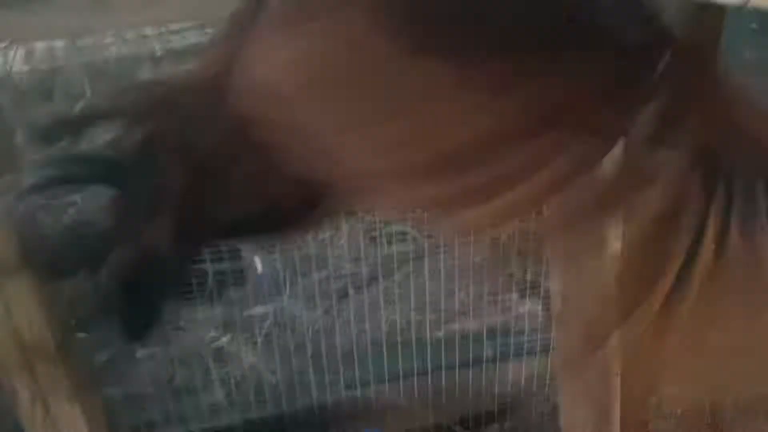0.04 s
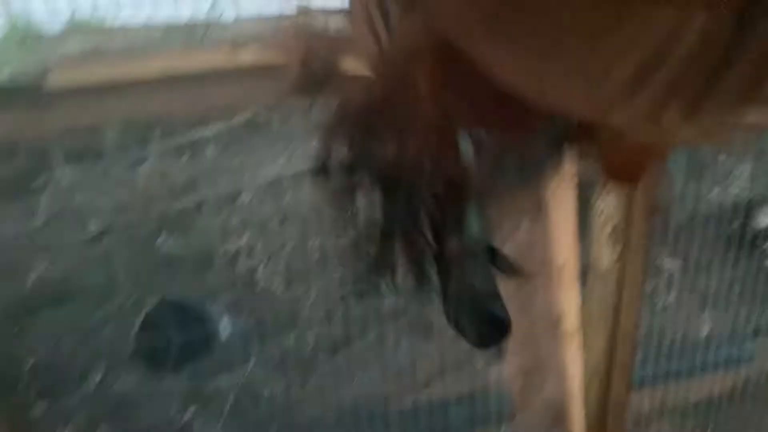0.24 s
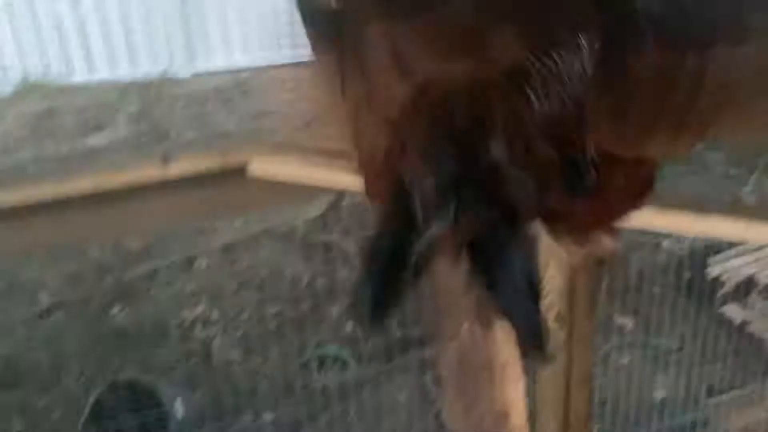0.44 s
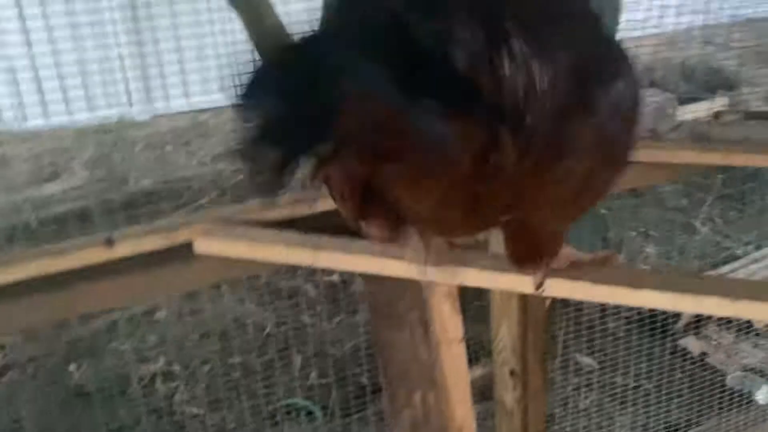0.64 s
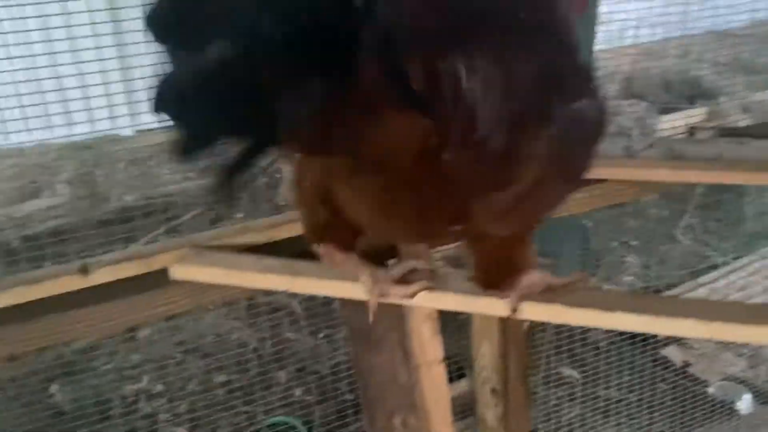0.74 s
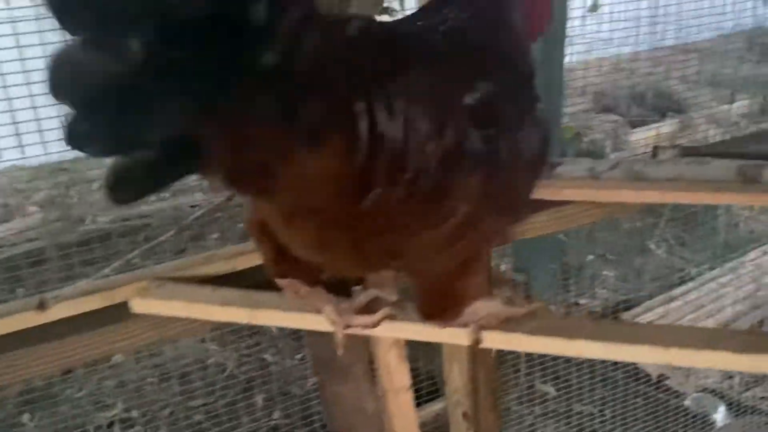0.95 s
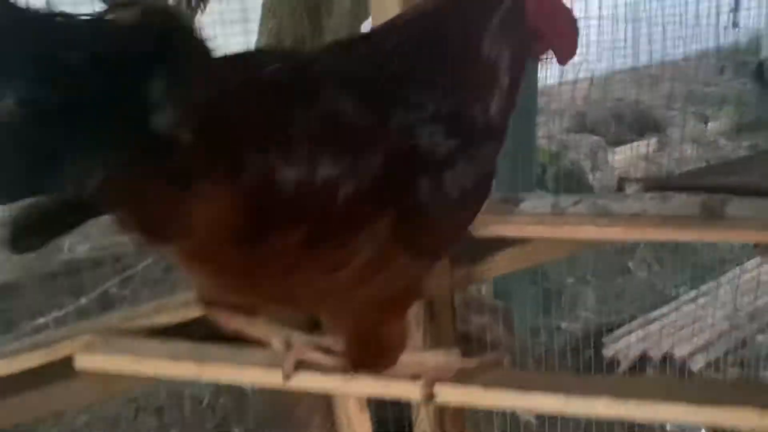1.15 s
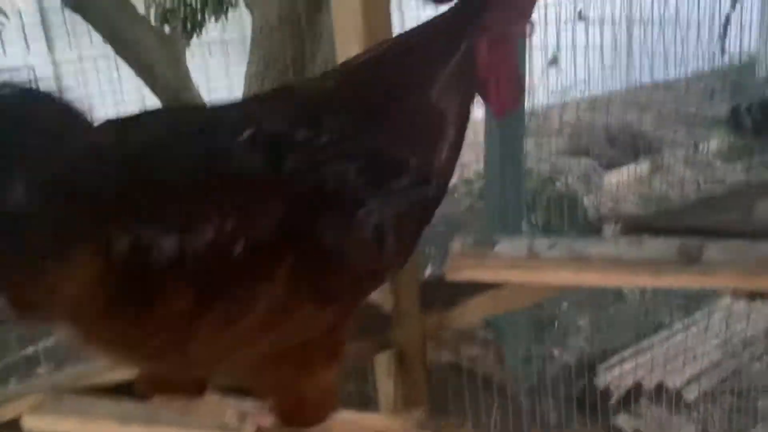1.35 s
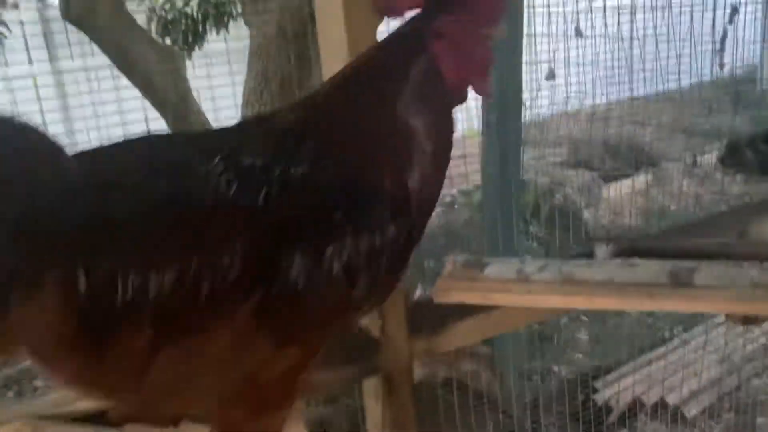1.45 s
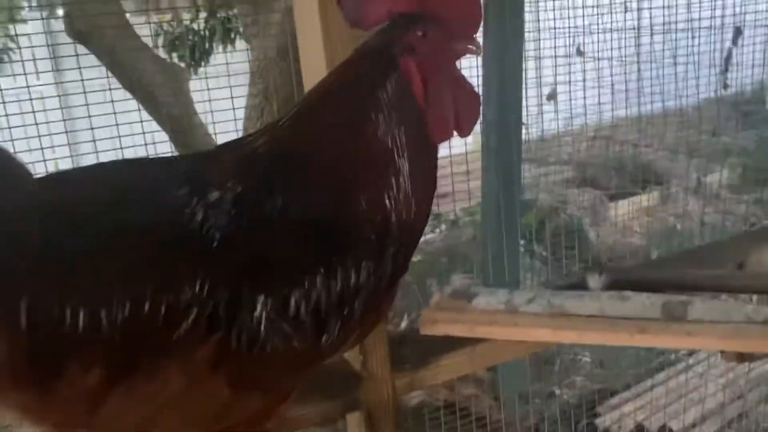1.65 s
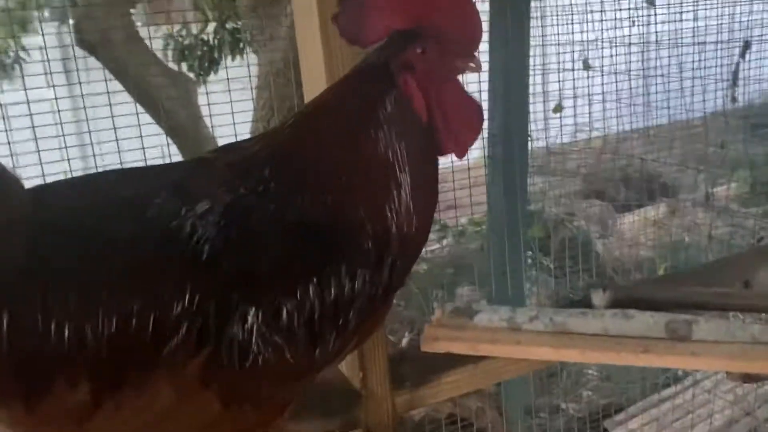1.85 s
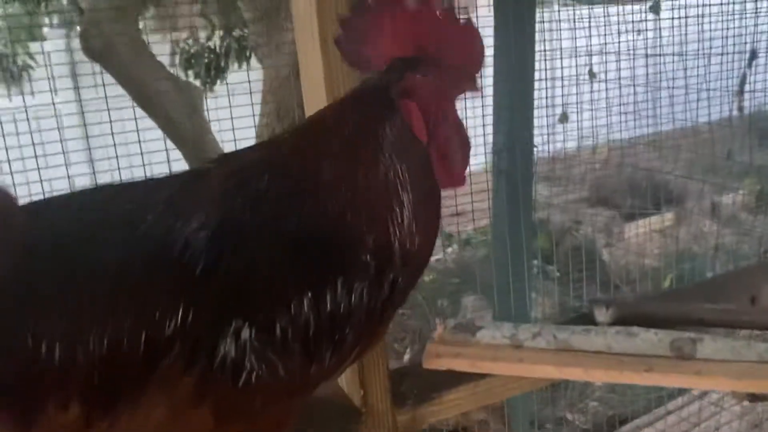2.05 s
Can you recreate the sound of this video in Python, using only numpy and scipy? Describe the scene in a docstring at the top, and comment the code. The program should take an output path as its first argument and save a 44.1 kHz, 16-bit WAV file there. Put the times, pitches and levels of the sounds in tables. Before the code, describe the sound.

Very close, booming wing gusts burst out almost at once and die within half a second, followed by claw clicks, dull scuffs, feather brushing, a faint low croon and small throaty clucks in a quiet wire coop.

```python
"""Rooster flapping onto a perch

A rooster flaps up onto a wooden perch in a wire coop, right beside the microphone.
Bursts of low, eddying noise make the wing gusts; grainy hiss makes the feathers rustle and brush.
Short noise bursts and decaying tones tick, knock and ring as claws meet the rail, and feet scuff it.
Rough pulse trains through throat filters cluck and croon over the filtered noise of a quiet yard."""
import sys
import numpy as np
from scipy import signal
from scipy.fft import rfft, irfft
from scipy.io import wavfile
from scipy.ndimage import uniform_filter1d

SR = 44100
rng = np.random.default_rng(int(sys.argv[2]) if len(sys.argv) > 2 else 0)


def waveform_to_disk(signal):
    """Save audio, clipped to [-1, 1], as 16-bit WAV at the path in sys.argv[1]."""
    frames = np.transpose(np.atleast_2d(signal))
    scaled = np.clip(frames, -1, 1) * 32767
    samples = np.round(scaled).astype(np.int16)
    wavfile.write(sys.argv[1], SR, samples)


N = 92610  # samples, 2.1 s
TIME = np.arange(N) / SR

# Colour tables give only the balance between frequencies: the coloured sound is then set to its level.
# Rise, fall and width times run from the peak to 1/e of it.

# Steady hush of the yard: freq_hz, relative_db
YARD_COLOUR = [(25, -58), (55, -6), (110, 3), (250, -8.5), (600, -6), (1200, -11.5), (3000, -24.5),
               (8000, -39.5), (15600, -39)]
YARD_DB, YARD_LIKENESS, YARD_LAG_S = -54.5, 0.63, 0.000326
# Low rumble of moving air: time_s, level_db
RUMBLE = [(0, -39.5), (.62, -39.5), (.82, -48), (1.0, -62), (1.2, -51), (1.57, -76), (1.7, -50), (1.9, -46),
          (2.1, -45.5)]
# Colour of the rumble: freq_hz, relative_db
RUMBLE_COLOUR = [(20, -47), (40, -13.5), (60, -2), (100, -7.5), (160, -18), (240, -13), (450, -30.5),
                 (1200, -82)]

# Feather rustle over time: time_s, treble_level_db, midrange_level_db
RUSTLE = [(0, -49, -54.5), (.14, -45, -43), (.3, -49, -57), (.42, -52, -53), (.53, -62.5, -58.5),
          (.8, -68.5, -55.5), (.95, -68, -57), (1.08, -56, -55), (1.23, -57, -61.5), (1.5, -61, -56),
          (1.8, -66, -69), (2.1, -82, -73)]
# Colour of the treble fizz: freq_hz, relative_db
FIZZ_COLOUR = [(800, 4), (2000, 0), (3300, 0), (5500, -2), (7400, -1), (10000, -3.5), (13000, -5),
               (15600, -4)]
# Colour of the midrange swish: freq_hz, relative_db
SWISH_COLOUR = [(100, -1), (250, 6), (500, -8), (1000, -0.5), (1500, -6.5), (2500, -16.5), (6000, -91)]
# GRAIN_DB spreads the grain sizes; GRAIN_SHARE is the grains' part of the mix with hiss
GRAIN_DB, GRAINS_PER_S, GRAIN_SHARE = 3, 700, 0.38

# Scuffs and dull knocks of feet and body on the perch: peak_s, rise_s, fall_s, level_db, centre_hz
SHUFFLES = [(0.094, 0.039, 0.012, -40.5, 616), (.52, 0.0084, 0.012, -41.5, 1120),
            (0.584, 0.018, 0.0074, -39.5, 715), (0.901, 0.0053, 0.0097, -50.5, 2000),
            (1.021, 0.039, 0.03, -46.5, 615), (1.057, 0.015, 0.0045, -40, 930),
            (1.074, 0.02, 0.016, -38, 177), (1.134, 0.005, 0.021, -48.5, 580)]
SHUFFLE_SKIRT = 2.58  # exponent of the slopes either side of the centre

# Wing gusts: peak_s, rise_s, fall_s, level_db, corner_hz
GUSTS = [(0.104, 0.028, 0.023, -31.5, 80.5), (0.189, 0.042, 0.042, -24, 62),
         (.231, 0.0057, 0.0057, -12.5, 318), (.242, 0.0052, 0.018, -8, 197),
         (0.272, 0.015, 0.013, -10.5, 443), (0.288, 0.0034, 0.007, -4.5, 605),
         (0.302, 0.0033, 0.014, -8.5, 422), (0.306, 0.043, 0.053, -10.5, 87),
         (.378, 0.02, 0.013, -17.5, 330), (0.408, 0.055, 0.048, -20, 164), (0.488, 0.013, 0.01, -19, 131),
         (0.538, 0.039, 0.052, -26.5, 78.6), (0.708, 0.0071, 0.017, -35.5, 77)]
GUST_ORDER, GUST_LOW_HZ, GUST_APART_HZ = 3.46, 38.5, 565  # left and right differ above GUST_APART_HZ
GUST_BOOM_HZ, GUST_BOOM_WIDTH_HZ, GUST_BOOM_DB = 59.6, 5.1, 6
GUST_LIKENESS, GUST_LEFT_DB = 0.92, 9
EDDIES_PER_S, EDDY_BLUR = 600, 0.38  # EDDY_BLUR is the noise added to eddies of rms 1

# Claw and quill clicks: time_s, level_db (before CLICK_DB), knock_against_tick_db (before KNOCK_DB)
CLICKS = [(0.0921, -29, 9.5), (0.112, -29.5, 1), (0.197, -28, -12), (0.2642, -22, 6.5), (0.2833, -25.5, 10),
          (0.5072, -28.5, -3), (0.5142, -34.5, 5.5), (0.561, -38.5, 3), (0.582, -34.5, -24),
          (0.595, -33.5, -5), (0.623, -52.5, 14.5), (0.6499, -35.5, -7.5), (0.6601, -32, -3),
          (0.982, -35.5, -5), (0.987, -32.5, -13), (1.05, -30.5, -23), (1.2874, -22, -39),
          (1.41, -33.5, -5.5), (1.5312, -46.5, 6.5), (1.6227, -32.5, -17), (1.666, -39, -24),
          (1.7632, -41.5, 8), (2.0518, -39.5, -30)]
# Colour of the tick: freq_hz, relative_db
TICK_COLOUR = [(900, -11.5), (2000, -2.5), (2700, 0), (4000, -1), (6000, -3.5), (7400, 4.5), (10000, -0.5),
               (15600, -7.5)]
# Colour of the wooden knock: freq_hz, relative_db
KNOCK_COLOUR = [(150, 5), (400, 12), (750, -1), (1500, 5), (2300, -22.5), (4000, -17.5)]
# What the claws set ringing: pitch_hz (before detuning), level_against_tick_db, t60_s
RING = [(2510, -18, 0.084), (3460, -15.5, 0.026), (5260, -16, 0.029), (7560, -20.5, 0.02)]
CLICK_ATTACK_S, TICK_S, KNOCK_S, RATTLE_S = 0.00043, 0.0006, 0.0033, 0.0044
CLICK_DB, KNOCK_DB, RATTLE_DB, CLICK_LEFT_DB = -3, 1.5, -11, 2.5
ECHO_S, ECHO_DB, CATCHES_PER_S = 0.003, -11.5, 350
# Softer clicks lose treble: DULLING is dB per octave above BRIGHT_HZ for each dB below FULL_CLICK_DB
BRIGHT_HZ, FULL_CLICK_DB, DULLING = 6020, -13.5, 0.61

# Wing feathers brushing along the body: peak_s, width_s, level_db
BRUSHES = [(0.21, 0.035, -47), (0.458, 0.018, -45), (0.866, 0.012, -55.5), (1.139, 0.021, -48),
           (1.955, 0.017, -57)]
# Colour of a brush stroke: freq_hz, relative_db
BRUSH_COLOUR = [(700, -8), (1500, 6.5), (3000, 0), (4600, 5.5), (5800, -3.5), (7400, -1), (10000, -7.5),
                (15600, 0)]

# Thin high ringing: peak_s, fall_s, level_db
ZINGS = [(.718, 0.023, -57.5), (.856, 0.023, -64.5)]
# Resonances of the ringing: freq_hz, relative_db
ZING_PEAKS = [(4480, -5.5), (5265, -10)]
ZING_WIDTH_HZ, ZING_RISE_S = 120, 0.006

# Clucks: peak_s, rise_s, fall_s, level_db, pitch_hz, glide_octaves_per_s, roughness_0_to_1, tilt_db_per_octave
CLUCKS = [(0.727, 0.015, 0.01, -44.5, 500, -8, 0.37, -17), (.753, 0.0077, 0.0056, -35.5, 370, 0, 0.3, -3),
          (1.554, 0.022, 0.023, -45.5, 274.8, -2.5, 0.38, -5.5),
          (1.5913, 0.0067, 0.0038, -28, 352.3, -3, 0.49, 1.5),
          (1.768, 0.0099, 0.0064, -42, 350, -5.5, 0.54, -1.5),
          (1.802, 0.004, 0.0064, -35.5, 445, -4.5, 0.48, 9.5),
          (1.944, 0.0078, 0.007, -45.5, 330, -1, 0.8, -2), (1.989, 0.011, 0.013, -42.5, 410, 5.5, 0, -1),
          (2.012, 0.011, 0.0071, -38.5, 460, -2.5, 0.3, -5.5)]
# Throat resonances of the clucks: freq_hz, relative_db
CLUCK_THROAT = [(100, -32), (260, 1.5), (340, 4.5), (470, -1.5), (720, 7), (1000, 1), (1300, -1),
                (1750, -8.5), (2050, -14.5), (2400, -25.5), (4500, -43)]
CLUCK_JITTER = 0.027  # pitch waver as a fraction, rms
BIRD_RIGHT_DB, BIRD_LAG_S = 5, 0.00041
FRAME_ECHO_S, FRAME_ECHO_DB = 0.013, -14

# Low croon: time_s, pitch_hz, level_db
CROON = [(.76, 244, -68), (.80, 253.4, -48), (.87, 266.3, -46), (.93, 269.2, -49), (.98, 279.4, -51.5),
         (1.04, 279, -49), (1.09, 277, -76)]
# Throat resonances of the croon: freq_hz, relative_db
CROON_THROAT = [(260, 5), (530, 2), (770, -7), (1050, -6), (1350, -21), (3500, -50)]
CROON_LAG_S = -0.00062  # negative: the left channel hears it first

# Coop reverberation by band: low_hz, high_hz, t60_s
COOP = [(95, 700, 0.14), (644, 2500, 0.13), (2650, 6000, 0.13), (6260, 11400, 0.077)]
CLICK_WET_DB, BIRD_WET_DB = -7.5, -15.5

# Phase between left and right channels: freq_hz, left_lead_radians
STEREO_PHASE = [(0, 0), (7500, 0), (8450, -2.6), (9500, -3.6), (10300, -6), (11900, -6.5), (12900, -9.2),
                (13700, -9.6), (14500, -12.3), (16300, -13)]
# Left-right likeness of sound from all around: freq_hz, likeness_-1_to_1
LIKENESS = [(50, 1), (300, 0.77), (700, -0.012), (1300, -0.29), (2500, 0.6), (5000, 0.18), (7400, 0.84),
            (9000, 0.98)]
EDGE_HZ = 15850  # corner of the final lowpass


def amp(db):
    """Decibels to gain."""
    return 10 ** (np.asarray(db) / 20)


def unit(x):
    """Scales to rms 1."""
    return x / np.sqrt(np.mean(x ** 2) + 1e-20)


def freqs(x):
    """Frequencies of the spectrum of x in Hz, kept above zero."""
    return np.maximum(np.fft.rfftfreq(x.shape[-1], 1 / SR), 1)


def read(points, x):
    """A spectrum table at the frequencies of x, joined along log frequency."""
    f, value = np.transpose(points)
    return np.interp(np.log(freqs(x)), np.log(f), value)


def curve(rows, axis=1):
    """One column of a time table at every sample."""
    rows = np.array(rows)
    return np.interp(TIME, rows[:, 0], rows[:, axis])


def shaped(x, gain):
    """Filters x and scales it to rms 1."""
    return unit(irfft(rfft(x) * gain, x.shape[-1]))


def sides(left_db):
    """Gains of the two channels for a given left-right difference."""
    return amp(np.array([[.5], [-.5]]) * left_db)


def pair(x, same):
    """Makes two unrelated signals as alike as `same` at each frequency."""
    a, b = rfft(x)
    same = np.clip(same, -1, 1)
    mid = a * np.sqrt(1 + same)
    side = b * np.sqrt(1 - same)
    return irfft(np.array([mid + side, mid - side]), x.shape[-1])


def diffuse(x, colour):
    """Colours two unrelated signals as a sound from all around."""
    return shaped(pair(x, read(LIKENESS, x)), amp(read(colour, x)))


def arrive(x, lag):
    """A sound from one side: the left channel hears it lag seconds after the right."""
    late = np.exp(-2j * np.pi * freqs(x) * lag)
    return irfft(rfft(x) * np.array([late, np.ones_like(late)]), x.shape[-1])


def swell(x, t, rise, fall, db):
    """Lets x rise to its level at t = 0 and fall away."""
    env = np.exp(-(t / np.where(t < 0, rise, fall)) ** 2)
    loudness = np.sqrt(np.mean((env * x) ** 2) / np.mean(env ** 2))
    return amp(db) * env * x / loudness


def add(mix, s, sound):
    """Mixes a sound in at time s, trimmed to fit."""
    at = round(s * SR)
    sound = sound[:, max(-at, 0):]
    part = mix[:, max(at, 0):][:, :sound.shape[1]]
    part += sound[:, :part.shape[1]]


def play(source, rows, size=11025):
    """Plays each row of a table, centred on its time."""
    out = np.zeros((2, N))
    t = (np.arange(size) - size // 2) / SR
    for s, *row in rows:
        add(out, s + t[0], source(t, *row))
    return out


def specks(size, per_s):
    """Sparse impulses of random sign."""
    signs = np.sign(rng.standard_normal((2, size)))
    return unit(signs * (rng.random((2, size)) < per_s / SR))


def barbs(size):
    """Many tiny catches of feather barbs in a smooth hiss."""
    sizes = amp(GRAIN_DB * np.minimum(rng.exponential(1, (2, size)), 4))
    caught = rng.random((2, size)) < GRAINS_PER_S / SR
    grains = sizes * rng.standard_normal((2, size)) * caught
    return GRAIN_SHARE * unit(grains) + (1 - GRAIN_SHARE) * rng.standard_normal((2, size))


def yard():
    """Steady outdoor hush from the right and a slow rumble of air."""
    hush_noise, rumble_noise = rng.standard_normal((2, 2, N))
    hush = arrive(pair(hush_noise, YARD_LIKENESS), YARD_LAG_S)
    hush = shaped(hush, amp(read(YARD_COLOUR, hush_noise)))
    rumble = diffuse(rumble_noise, RUMBLE_COLOUR)
    return amp(YARD_DB) * hush + amp(curve(RUMBLE)) * rumble


def feathers():
    """Barbs slide over each other: a crackling fizz above a soft swish."""
    fizz = diffuse(barbs(N), FIZZ_COLOUR) * amp(curve(RUSTLE))
    swish = diffuse(barbs(N), SWISH_COLOUR) * amp(curve(RUSTLE, axis=2))
    return fizz + swish


def shuffle(t, rise, fall, db, centre_hz):
    """A scuff or dull knock against the rail: noise gathered around one frequency."""
    x = rng.standard_normal((2, len(t)))
    ratio = freqs(x) / centre_hz
    band = 1 / (ratio ** SHUFFLE_SKIRT + ratio ** -SHUFFLE_SKIRT)
    return swell(shaped(pair(x, read(LIKENESS, x)), band), t, rise, fall, db)


def gust(t, rise, fall, db, corner_hz):
    """Eddies from a wing thump in the microphone ports: large ones reach both, small ones mostly the left."""
    x = specks(len(t), EDDIES_PER_S) + EDDY_BLUR * rng.standard_normal((2, len(t)))
    f = freqs(x)
    large = 1 / (1 + (f / GUST_APART_HZ) ** 2)
    boom = amp(GUST_BOOM_DB / (1 + ((f - GUST_BOOM_HZ) / GUST_BOOM_WIDTH_HZ) ** 2))
    # a higher corner lets more of the small, fast-air eddies through
    colour = boom / (1 + (f / corner_hz) ** GUST_ORDER) / (1 + (GUST_LOW_HZ / f) ** 7)
    lean = sides(GUST_LEFT_DB * (1 - large))
    return swell(shaped(pair(x, GUST_LIKENESS * large), colour * lean), t, rise, fall, db)


def click(t, db, knock_db):
    """A hard tick, its near reflection, a rattle as the claw settles, a short wood knock, a faint ring."""
    def dying(life):
        """A quick attack and an exponential decay."""
        return np.clip(t / CLICK_ATTACK_S, 0, 1) * np.exp(-abs(t) / life)

    tick_noise, knock_noise = rng.standard_normal((2, 2, len(t)))
    octaves_up = np.log2(np.maximum(freqs(t) / BRIGHT_HZ, 1))
    dull = amp(DULLING * (db - FULL_CLICK_DB) * octaves_up)
    snap = shaped(diffuse(tick_noise, TICK_COLOUR), dull)
    tick = swell(snap, t, TICK_S, TICK_S, 0)
    reflection = swell(snap, t - ECHO_S, 2 * TICK_S, 2 * TICK_S, ECHO_DB)
    catches = shaped(diffuse(specks(len(t), CATCHES_PER_S), TICK_COLOUR), dull)
    rattle = catches * dying(RATTLE_S) * amp(RATTLE_DB)
    knock = diffuse(knock_noise, KNOCK_COLOUR) * dying(KNOCK_S) * amp(KNOCK_DB + knock_db)
    ring = 0
    for hz, ring_db, t60 in RING:
        detuned_hz = hz * (1 + 0.0303 * rng.standard_normal())
        tone = np.sin(2 * np.pi * detuned_hz * t + np.pi * rng.random((2, 1)))
        ring = ring + amp(ring_db) * dying(t60 / np.log(1000)) * tone
    return amp(db + CLICK_DB) * (tick + reflection + rattle + knock + ring) * sides(CLICK_LEFT_DB)


def brush(t, width, db):
    """One stroke of feather over feather: grainy hiss that swells and fades evenly."""
    return swell(diffuse(barbs(len(t)), BRUSH_COLOUR), t, width, width, db)


def zing(t, fall, db):
    """A light scrape that rings in a few narrow, high resonances, alike in both channels."""
    x = rng.standard_normal(len(t))
    gain = sum(amp(peak_db) / (1 + ((freqs(x) - hz) / ZING_WIDTH_HZ) ** 2) for hz, peak_db in ZING_PEAKS)
    return np.array([swell(shaped(x, gain), t, ZING_RISE_S, fall, db)] * 2)


def syrinx(hz, rough, jitter, count=12):
    """The bird's voice source: wavering pulses with a puff of noise in each cycle."""
    waver = unit(uniform_filter1d(rng.standard_normal(len(hz)), size=200))
    turns = np.cumsum(hz * (1 + jitter * waver)) / SR
    pulses = sum(np.cos(2 * np.pi * k * turns) for k in range(1, count + 1))
    puffs = (1 + np.cos(2 * np.pi * turns)) * rng.standard_normal(len(hz))
    return (1 - rough) * unit(pulses) + 2 * rough * unit(puffs)


def cluck(t, rise, fall, db, hz, glide, rough, tilt_db):
    """A few gliding pulses through the throat, off to the right, and their echo from the frame."""
    voice = syrinx(hz * 2 ** (glide * t), rough, CLUCK_JITTER)
    # the tilt starts at the pitch and levels off at 1800 Hz
    tilt = tilt_db * np.log2(np.clip(freqs(voice), hz, 1800) / hz)
    voice = shaped(voice, amp(read(CLUCK_THROAT, voice) + tilt))
    voice = swell(voice, t, rise, fall, db)
    echo = np.interp(t - FRAME_ECHO_S, t, voice)
    return arrive(voice, BIRD_LAG_S) * sides(-BIRD_RIGHT_DB) + amp(FRAME_ECHO_DB) * echo


def croon():
    """One long, soft, slowly rising note from a bird on the left, with the coop around it."""
    voice = syrinx(curve(CROON), rough=0.18, jitter=0.0153)
    voice = shaped(voice, amp(read(CROON_THROAT, voice)))
    sounding = (TIME > CROON[0][0]) * (TIME < CROON[-1][0])
    voice = voice * amp(curve(CROON, axis=2)) * sounding
    voice = arrive(voice, CROON_LAG_S) * sides(left_db=2.5)
    return voice + amp(-7.0) * coop(voice)


def coop(x, size=13230):
    """Short scattered reflections from roof and frame: noise dying at its own rate in each band."""
    t = np.arange(size) / SR
    noise = rng.standard_normal((2, size))
    f = freqs(noise)
    spectrum = rfft(pair(noise, read(LIKENESS, noise)))
    tail = sum(irfft(spectrum * (f >= lo) * (f < hi), size) * amp(-60 * t / t60) for lo, hi, t60 in COOP)
    tail = tail * (t > .003)  # a short gap before the first reflections
    return signal.fftconvolve(x, unit(tail) / np.sqrt(size), axes=1)[:, :N]


def scene():
    """Wings, feet and calls in the coop."""
    wings = feathers() + play(gust, GUSTS) + play(brush, BRUSHES)
    feet = play(shuffle, SHUFFLES) + play(click, CLICKS) + play(zing, ZINGS)
    calls = play(cluck, CLUCKS)
    reflections = coop(amp(CLICK_WET_DB) * feet + amp(BIRD_WET_DB) * calls)
    return yard() + wings + feet + calls + croon() + reflections


def record(dry):
    """The recorder's stereo processing turns the treble out of phase; soft overload, then the band limit."""
    turn = np.exp(.5j * np.interp(freqs(dry), *np.transpose(STEREO_PHASE)))
    x = irfft(rfft(dry) * np.array([turn, 1 / turn]), N)
    x = x / (1 + x ** 8) ** (1 / 8)
    band_limit = signal.firwin(511, EDGE_HZ, window=("kaiser", 9), fs=SR)
    return signal.oaconvolve(x, band_limit[None], "same")


dry = scene()
out = record(dry)
waveform_to_disk(out)
```